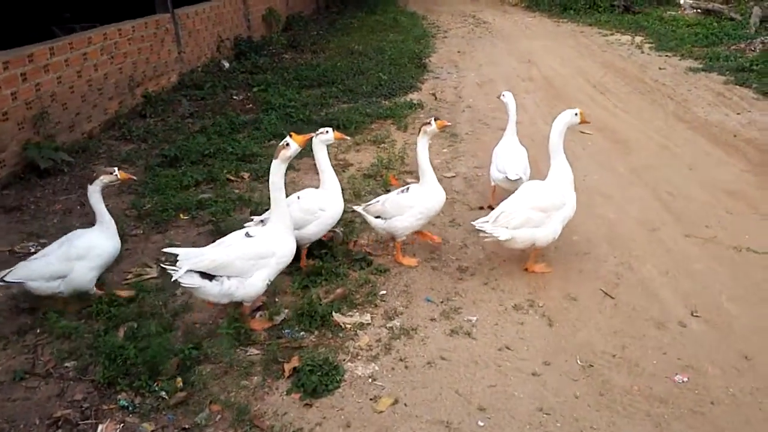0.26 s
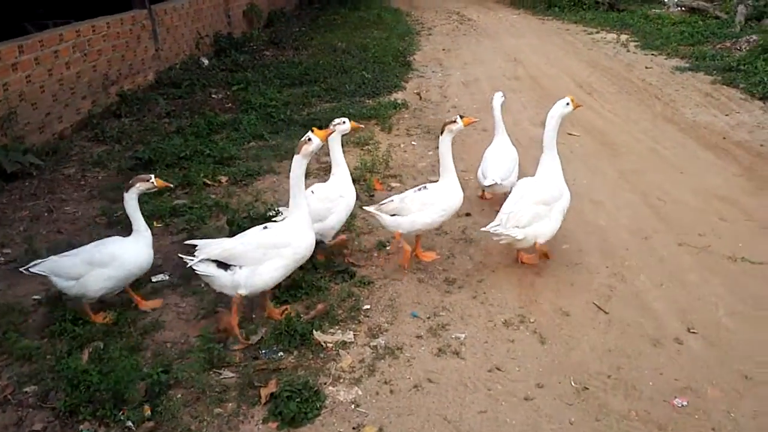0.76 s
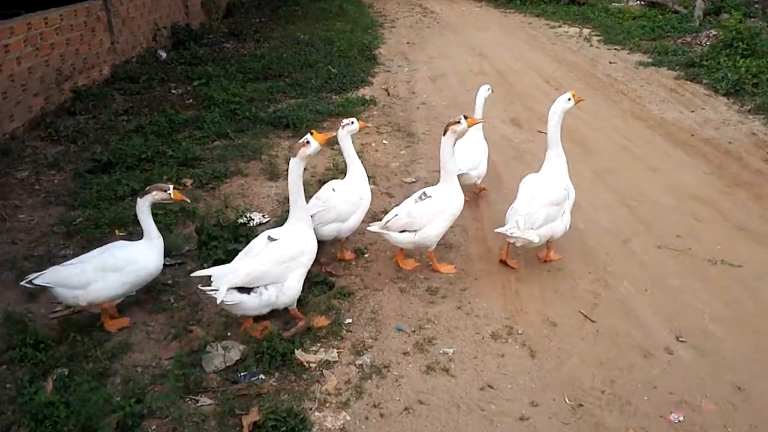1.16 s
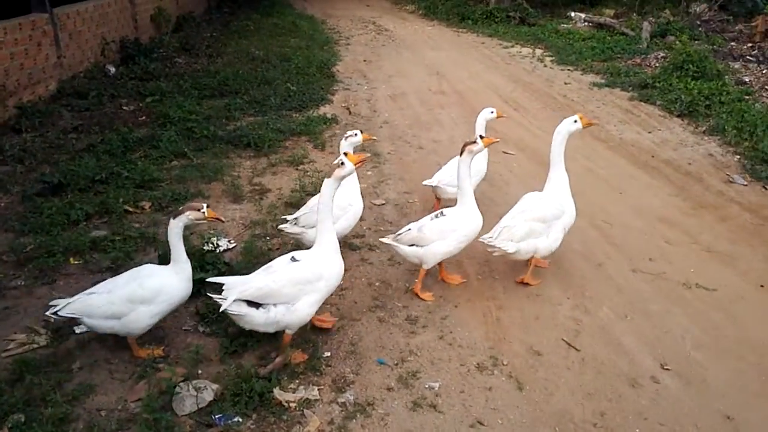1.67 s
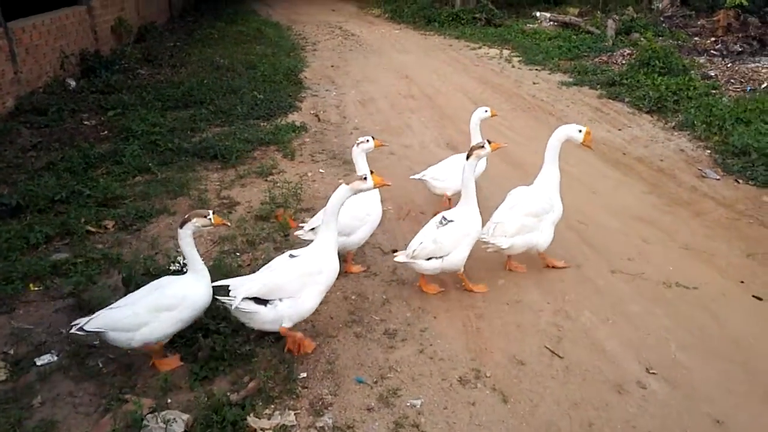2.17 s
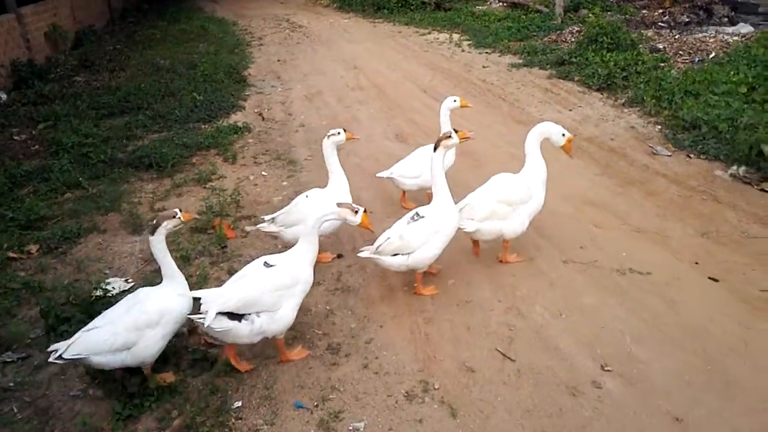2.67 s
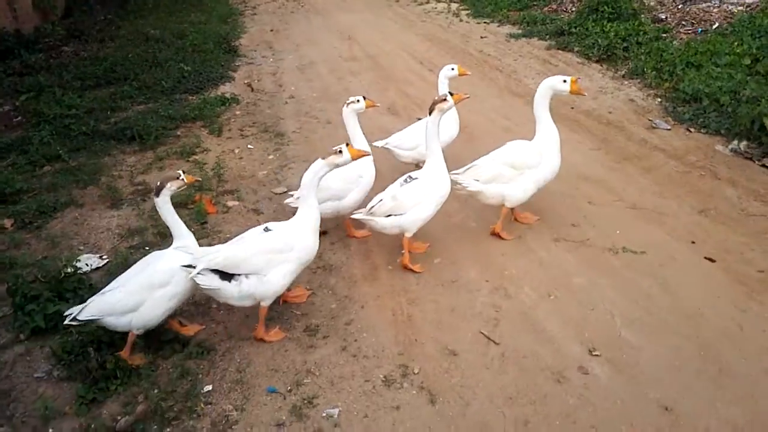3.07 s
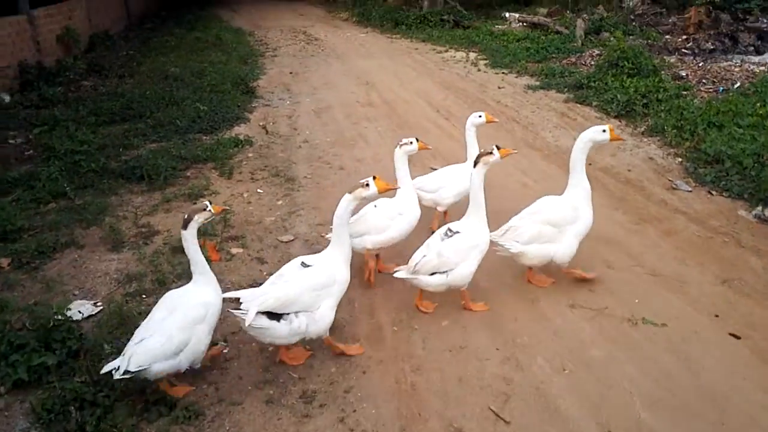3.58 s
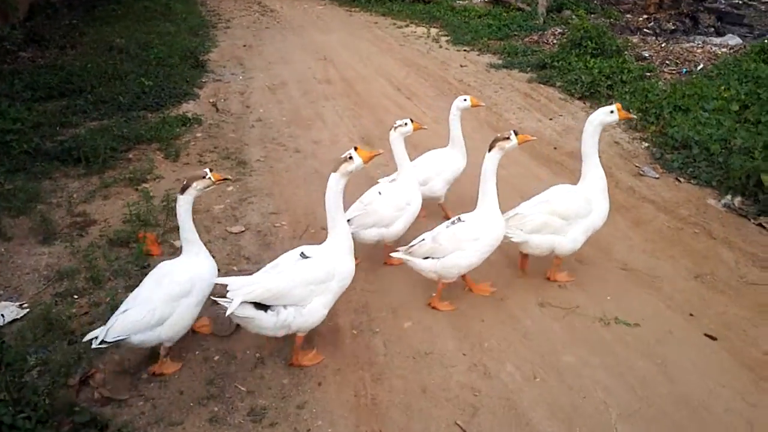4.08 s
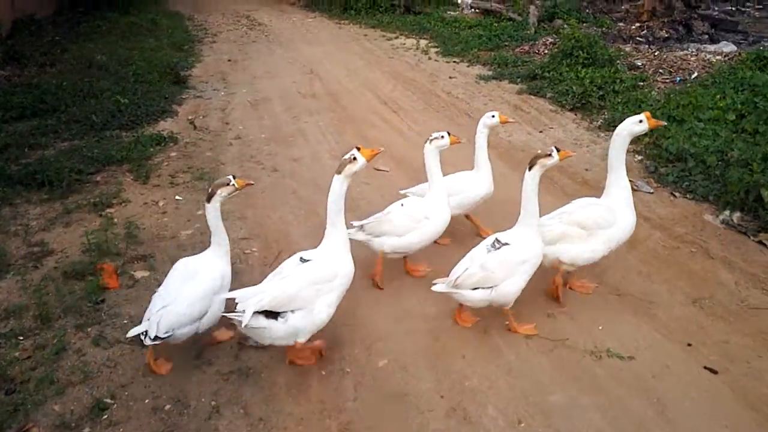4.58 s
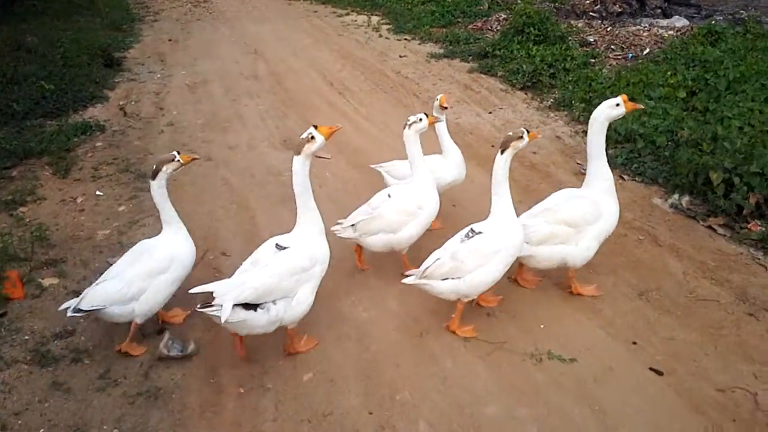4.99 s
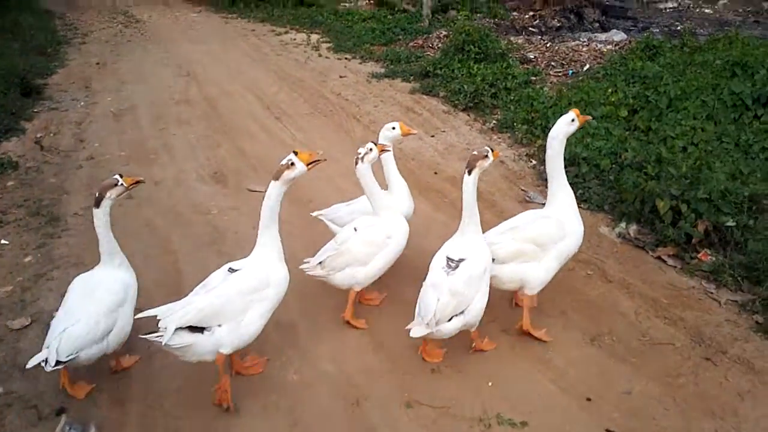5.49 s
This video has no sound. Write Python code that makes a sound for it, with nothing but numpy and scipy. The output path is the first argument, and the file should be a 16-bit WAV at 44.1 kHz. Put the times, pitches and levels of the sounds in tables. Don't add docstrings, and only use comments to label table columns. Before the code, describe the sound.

A small flock honks raspily close by outdoors, some calls breaking into clear tones, while feet crunch lightly on gritty ground.

```python
import sys
import numpy as np
from scipy import signal
from scipy.io import wavfile
from scipy.ndimage import uniform_filter1d

SR = 44100
rng = np.random.default_rng(int(sys.argv[2]) if len(sys.argv) > 2 else 0)


def transcribe(u):
    v = np.clip(np.atleast_2d(u).T, -1, 1)
    q = np.round(v * 32767).astype(np.int16)
    wavfile.write(sys.argv[1], SR, q)


def attenuation_scalar(level_db):
    decades = np.asarray(level_db, float) / 20
    return 10 ** decades


N = 253134

# f/Hz, width/Hz, level/dB
PIPE_1 = [(718, 46, 0), (1068, 12.6, 4), (1578, 100, 3.5), (1619, 31, 0.5), (2005, 12, 7.5),
          (3000, 110, -20), (3780, 170, -5.5), (5110, 130, -10), (6000, 550, -20.5), (8040, 2100, -24)]
PIPE_2 = [(626, 32.4, 2), (1055, 43, 0), (1262, 165, -0.5), (1426, 108, 1), (2020, 98, -8),
          (2736, 57, -8.5), (3426, 180, -7), (4000, 36, -10.5), (4330, 140, -14.5), (4810, 120, -11),
          (5490, 290, -19.5), (7340, 930, -23)]
PIPE_3 = [(700, 194, -15), (1430, 98, -4), (1710, 110, -9.5), (1900, 330, -17), (3330, 510, -16.5),
          (3630, 46, -13), (3940, 680, -20), (5510, 250, -21.5)]
PIPE_4 = [(512.4, 23, 6.5), (630, 170, -8.5), (915, 89, -5), (1265, 27, 7), (1690, 69, 4.5), (1720, 17, -4),
          (2360, 28, -8.5), (3070, 50, -9), (3500, 68, -6)]
PIPE_GRUNT = [(500, 29, -3.5), (630, 59, 3), (694, 81, -1), (984, 21, -11.5), (1450, 110, -19),
              (2150, 170, -21), (3340, 870, -18)]
PIPE_5 = [(567, 108, -3), (872, 23, -4), (1019.5, 26, 7), (1149, 71, 0.5), (1452, 47, 0), (1772, 33, 1),
          (2230, 250, -12.5), (2840, 95, -8), (3450, 131, -1.5), (3940, 130, -7), (4570, 217, -6),
          (5430, 470, -15), (6620, 1960, -12)]
PIPE_GROWL = [(490, 42, 0), (630, 22, 7.5), (967.5, 65, 2.5), (1400, 260, -5), (2810, 47, -2),
              (3350, 170, -1), (4500, 1300, -5.5), (6330, 690, -11.5)]
PIPE_6 = [(556, 28.7, 2.5), (680, 160, -10.5), (1060, 190, -0.5), (1152, 80, 0.5), (1400, 60, 2),
          (1771, 8.8, 0), (1872, 34, -2), (2795, 110, -12), (3360, 105, -4), (3800, 160, -11),
          (4470, 200, -10.5), (5680, 770, -21), (7000, 380, -17), (8600, 460, -39)]
# f/Hz, density/dB
HISS = [(900, -4), (1500, -0.5), (2400, 1), (3300, -1.5), (4500, 0), (6500, -2), (7800, -2), (9000, 3.5),
        (10200, -3.5), (11500, -8), (13500, -9.5), (14900, -15)]


def evened(x):
    return x / np.sqrt(np.mean(x ** 2) + 1e-20)


def add(mix, start_s, sound):
    part = mix[round(start_s * SR):][:len(sound)]
    part += sound[:len(part)]


def played(rows):
    s, *columns = np.transpose(rows)
    t = np.arange(s[0], s[-1], 1 / SR)
    return s[0], [np.interp(t, s, c) for c in columns]


def wander(n, size):
    return evened(uniform_filter1d(uniform_filter1d(rng.standard_normal(n), size), size))


def resonate(x, hz, width_hz):
    turn = np.exp(2j * np.pi * np.cumsum(hz * np.ones(len(x))) / SR)
    r = np.exp(-np.pi * max(width_hz, 5) / SR)
    return 2 * (turn * signal.lfilter([1 - r], [1, -r], x / turn)).real


def breath(start, length, db, hz, climb_hz, under_db, swell_s, first, last):
    climb_s, release_s, darken_s = .2, 0.063, 0.68
    fade_db_per_s, sag_per_s = 320, 1.367
    sag_lead_s = 0.05025
    t = np.arange(0, length + release_s, .005)
    after = np.maximum(t - length, 0)
    effort_db = db - under_db * np.exp(-t / swell_s) - fade_db_per_s * after
    sagging = np.maximum(t - length + sag_lead_s, 0) ** 1.5 / sag_lead_s ** .5 / 2
    rate_hz = (hz + climb_hz * (1 - np.exp(-t / climb_s))) * (1 - sag_per_s * sagging)
    bright = np.interp(t, [0, length], [first, last]) * np.exp(-after / darken_s)
    return np.transpose([start + t, effort_db, rate_hz, bright])


def honk(rows, pipe, rough, jitter, hum_db, bulge, slide, mid_db, burst_db, throb_db):
    throb_hz = 36.05
    start, (effort_db, hz, bright) = played(rows)
    n = len(hz)
    u = np.linspace(-.5, .5, n)
    stretch = (hz / np.median(hz)) ** .8
    moved = 1 + slide * u
    bright = bright + bulge * np.cos(np.pi * u)
    turns = np.cumsum(hz * (1 + jitter * wander(n, size=330))) / SR
    uneven = attenuation_scalar(1.5 * rough * rng.standard_normal(400)[turns.astype(int)])
    pulses = sum(np.cos(2 * np.pi * k * turns - .27 * k ** 2) / (1 + (k / 28) ** 2) for k in range(1, 58))
    puffs = (.5 + np.exp(-(turns % 1) / .4)) * rng.standard_normal(n)
    drive = uneven * (np.sqrt(1 - rough) * evened(pulses) + np.sqrt(rough) * evened(puffs))
    bursts = attenuation_scalar(.5 * burst_db * wander(n, size=260))
    throb = attenuation_scalar(throb_db * np.sin(2 * np.pi * throb_hz * u * n / SR + .4 * np.log(bursts)))
    low, high = np.zeros(n), np.zeros(n)
    for k, (f, width_hz, db) in enumerate(pipe):
        curve_hz = f * (stretch if f < 2500 else moved)
        ring = (-1) ** k * attenuation_scalar(db) * resonate(drive, curve_hz, 1.74 * width_hz)
        if 1500 < f < 2500:
            ring = ring * attenuation_scalar(mid_db * u)
        if f < 2500:
            low += resonate(ring, curve_hz, 900)
        else:
            high += resonate(ring, curve_hz, .18 * f) * (abs(bright) * bursts) ** (f / 3000)
    beak = signal.butter(6, 450, "high", fs=SR, output="sos")
    body = signal.sosfilt(beak, low + high) / np.std(low)
    hum = attenuation_scalar(hum_db) * uneven * np.sin(2 * np.pi * turns)
    return start, attenuation_scalar(effort_db) * (throb * body + hum) * signal.windows.tukey(n, .04)


def honking():
    # t/s, length/s, effort/dB, pulse rate/Hz, climb/Hz
    calls = [
        (1.337, 0.12, -34, 162, 9.1),
        (1.48, 0.27, -33, 168.8, 12.9),
        (1.779, 0.36, -38.5, 234.5, 20.3),
        (2.499, 0.48, -46, 149.9, 21.1),
        (3.596, 0.18, -38, 144.3, 15.8),
        (3.744, 0.43, -33.5, 151.6, 25.8),
        (4.709, 0.255, -40.5, 118.3, 16),
        (5.149, 0.024, -37, 147.8, 1.1),
        (5.206, 0.42, -33, 149.6, 23),
        (5.622, .12, -36, 170.8, 3.1),
    ]
    # level under full effort/dB, swell/s, brightness at start, at end, beak hiss/dB
    openings = [(14.8, 0.022, 0.97, 1.13, -41), (6.5, 0.069, 1.05, 1.02, -22.5),
                (3.5, 0.16, 0.58, 0.89, -18), (22, 0.021, 0.6, 1.57, -37), (28, 0.037, 0.4, 0.59, -38),
                (10.3, 0.06, 1.06, 0.86, -45), (15.4, 0.12, 0.17, 1.42, -24), (14, 0.016, 2, 1.3, -2),
                (15.7, 0.031, 0.99, 0.79, -28), (9, 0.028, .45, 0.52, -37)]
    # windpipe, roughness 0-1, rate jitter share, hum/dB
    voices = [(PIPE_1, .62, .011, -28), (PIPE_2, .62, .011, -31), (PIPE_3, .78, .02, -60),
              (PIPE_4, .67, .012, -26), (PIPE_GRUNT, .68, .02, -24), (PIPE_5, .6, .011, -27),
              (PIPE_GROWL, .82, .1, -30), (PIPE_6, .7, .02, -29), (PIPE_6, .58, .01, -29),
              (PIPE_6, .75, .02, -29)]
    # extra brightness midway, treble slide share, change at 1.5-2.5 kHz/dB, treble bursts/dB
    beaks = [(0.071, 0.044, 2.5, 1), (0.21, -0.056, -3, 1), (0, -0.057, 1, 1), (0, 0.012, 2.5, 4),
             (0.21, 0, 15, 7), (0, -0.089, -12.5, 2), (0, 0.041, 0, 2.5), (0, 0.0018, 13, 4),
             (0.077, -0.11, -13.5, 2.5), (0, 0, -3, 6)]
    throbs_db = [2.5, 1, .6, 1.5, 1, 1.8, .6, 0, .8, .8]
    mix = np.zeros(N)
    hiss = np.tile(breeze(HISS, 0, patchy_db=-2.0, flicker_db=4.5), 2)
    for call, (*opening, hiss_db), voice, beak, throb_db in zip(calls, openings, voices, beaks, throbs_db):
        rows = breath(*call, *opening)
        add(mix, *honk(rows, *voice, *beak, throb_db))
        start, (effort_db, _, _) = played(rows)
        add(mix, start, attenuation_scalar(effort_db + hiss_db) * hiss[round(start * SR):][:len(effort_db)])
    return mix


def note(start, length, db, hz, glide_hz_per_s):
    edge_db, edge_droop, early = 19, 0.054, 0.83
    u = np.linspace(0, 1, 21)
    off = (2 * u ** early - 1) ** 2
    pitch_hz = hz * (1 - edge_droop * off) + glide_hz_per_s * length * (u - .5)
    return np.transpose([start + u * length, pitch_hz, db - edge_db * off ** 1.2])


def tone(rows, tones, waver=0.0068, flutter_db=-5.5, lock=(0, 0, 0)):
    start, (hz, level_db) = played(rows)
    t = start + np.arange(len(hz)) / SR
    lock_start_s, lock_end_s, dulling_db_per_s = lock
    slope_db = -dulling_db_per_s * abs(t - np.clip(t, lock_start_s, lock_end_s))
    turns = np.cumsum(hz * (1 + waver * wander(len(hz), size=300))) / SR
    stack = np.zeros(len(hz))
    for k, db in tones:
        flutter = flutter_db * min(k / 4, 1) ** .5 * wander(len(hz), size=1100)
        gain = attenuation_scalar(db - tones[0][1] + k * slope_db + flutter)
        stack += gain * np.sin(2 * np.pi * k * turns + 0.132 * k ** 2)
    return start, np.sqrt(2) * attenuation_scalar(level_db) * stack * signal.windows.tukey(len(hz), .1)


def clear_calls():
    # t/s, f/Hz, level/dB
    drone = [(1.77, 960, -34), (1.8, 965, -39), (2.1, 1039, -36.5), (2.148, 1018, -44), (2.165, 1040, -62)]
    last_drone = [(5.419, 993.5, -39), (5.551, 1009, -35.5), (5.74, 1028, -32)]
    whine = [(1.78, 678, -49), (1.95, 708, -39), (2.2, 745, -47.5), (2.524, 761, -48), (2.62, 811, -55)]
    moan = [(3.605, 616, -53), (3.64, 626, -50), (3.75, 630, -43), (3.9, 641, -39.5), (4.03, 610, -43),
            (4.08, 610, -74)]
    bugle = [(4.92, 472, -58), (4.955, 478, -45.5), (4.99, 484.6, -41), (5.06, 488, -41.5),
             (5.12, 489.2, -40.5), (5.15, 492, -44), (5.18, 475, -45.5), (5.21, 461, -38)]
    chirp = [(5.146, 1303, -52), (5.156, 1324, -35), (5.172, 1370, -30), (5.183, 1372, -28),
             (5.196, 1334, -34), (5.212, 1270, -43)]
    # t/s, f/Hz, level/dB
    ringing = [
        [(1.545, 1440, -50), (1.57, 1441, -42), (1.66, 1450, -40), (1.685, 1460, -52)],
        [(1.685, 1372, -46), (1.705, 1387, -35), (1.722, 1400, -33.5), (1.74, 1450, -35), (1.765, 1450, -35),
         (1.78, 1420, -50)],
        [(2.52, 1502, -50), (2.55, 1521, -47), (2.64, 1585, -56), (2.74, 1632, -52), (2.79, 1672, -53)],
        [(5.29, 1363, -42), (5.32, 1380, -33.5), (5.36, 1400, -31), (5.385, 1430, -33), (5.4, 1420, -46)],
        [(5.385, 1490, -50), (5.41, 1515, -37), (5.44, 1535, -48)],
        [(5.6, 1394, -40), (5.632, 1396, -34), (5.648, 1400, -46)],
        [(5.67, 1410, -43), (5.69, 1423, -36), (5.72, 1400, -43), (5.74, 1400, -37)],
    ]
    # multiple of pitch, level/dB
    drone_tones = [(1, 10.5), (2, -2), (3.009, -18), (4.01, -13.5)]
    whine_tones = [(1, 7), (2, 5.5), (3, -9), (4, -10.5), (5, -9.5), (6, -8), (7, -26), (8, -40), (9, -43),
                   (10, -19)]
    hoarse_whine_tones = [(1, 9), (2, 10), (3, 2), (4, -18), (5, -16)]
    bugle_tones = [(1, -2.5), (2, -1.5), (3, -7), (4, -15.5), (5, -20), (6, -17), (7, -8.5), (8, -16.5),
                   (9, -12), (10, -12.5), (11, -15), (12, -12), (13, -14), (14, -15.5), (15, -25),
                   (16, -18), (17, -4.5), (18, -7), (19, -13), (20, -18), (21, -15), (22, -15), (23, -25),
                   (24, -40), (25, -36), (26, -21)]
    closing_tones = [(1, 0), (1.5, 0), (2, -6), (2.749, -24.5)]
    pure = [(0.98, 0)]
    # t/s, length/s, peak/dB, f/Hz, glide/(Hz/s)
    peeps = [(0.458, 0.035, -56, 790, 0), (0.505, 0.03, -60, 780, 0), (0.652, 0.025, -57, 1400, -3000),
             (0.6, 0.078, -46, 772, -700), (0.677, 0.28, -63.5, 780, -30), (4.948, 0.038, -44, 1330, 300),
             (5.139, 0.158, -42.5, 617, -500), (5.547, 0.1, -44, 1380, -100), (5.67, 0.1, -39, 1510, 0),
             (2.664, 0.028, -40, 1610, 2), (2.754, 0.04, -50, 1660, 2), (2.668, 0.03, -52, 3520, 0),
             (2.755, .03, -54, 3480, 0), (1.85, .17, -57, 3600, 700), (2.031, .12, -55, 3860, 500)]
    yelps = [
        (2.14, 0.09, -50, 685, -2000),
        (2.465, 0.079, -50.5, 713, -10),
        (2.89, 0.16, -50, 648, -350),
    ]
    mix = np.zeros(N)
    for rows in (drone, last_drone):
        add(mix, *tone(rows, drone_tones, waver=0.0143, flutter_db=3.0))
    for rows in (whine, note(*yelps[1])):
        add(mix, *tone(rows, whine_tones, flutter_db=3.5, lock=(2.4, 2.5, 11)))
    add(mix, *tone(note(*yelps[-1]), closing_tones, waver=0.011))
    add(mix, *tone(note(*yelps[0]), hoarse_whine_tones, waver=0.0076))
    add(mix, *tone(bugle, bugle_tones, waver=.001, flutter_db=2.0, lock=(5.0, 5.13, 22)))
    add(mix, *tone(moan, pure, waver=.035, flutter_db=4))
    for peep in peeps:
        add(mix, *tone(note(*peep), pure, waver=.007, flutter_db=2.4))
    add(mix, *tone(chirp, [(1, 0), (2, -26)], waver=.002, flutter_db=.5))
    for rows in ringing:
        add(mix, *tone(rows, [(1, 0)], waver=.006, flutter_db=3))
    return mix


def geese():
    calls = honking() + clear_calls()
    t = np.arange(SR // 2) / SR
    echoes = rng.choice([-1., 1.], len(t)) * (rng.random(len(t)) < .03) * (t > .008)
    echoes *= attenuation_scalar(-60 * t / .2) + attenuation_scalar(-13 - 60 * t / .7)
    return calls + attenuation_scalar(-17) * signal.oaconvolve(calls, echoes / np.linalg.norm(echoes))[:N]


def scuffs():
    # t/s, level/dB, length/s, centre f/Hz, width/Hz
    drags = [(0.422, -54.5, 0.09, 7000, 5200), (0.51, -47, 0.065, 8500, 7000),
             (0.961, -58, 0.12, 8900, 2500), (1.03, -53, 0.048, 9050, 4800),
             (2.345, -55.5, 0.11, 5900, 10000), (2.479, -55, 0.076, 4100, 3300),
             (3.4, -56.5, 0.084, 9200, 5000), (3.4, -63, .075, 3000, 700), (3.34, -66, 0.027, 1700, 600),
             (1.245, -66, 0.037, 1150, 420), (3.491, -57, 0.1, 9550, 2500), (3.522, -58, 0.098, 2980, 810),
             (4.383, -73, 0.065, 2980, 890), (4.406, -60.5, 0.049, 1320, 900),
             (4.13, -51.5, 0.1, 7200, 6000), (4.6, -60, 0.01, 2960, 4170),
             (4.443, -48.5, 0.0075, 2000, 3000), (4.499, -52, 0.023, 3300, 6900),
             (4.547, -56, 0.028, 3500, 8400), (4.4745, -43.5, 0.033, 3020, 8900),
             (4.527, -40.5, 0.018, 8700, 4000), (4.527, -45.5, 0.021, 610, 1180),
             (4.578, -46, 0.042, 9400, 3500), (4.579, -51, 0.033, 4700, 1500),
             (4.576, -56.5, 0.079, 1100, 1100), (4.62, -60.5, 0.11, 8700, 2200),
             (4.608, -56, 0.037, 6000, 6100)]
    mix = np.zeros(N)
    for s, db, length, hz, width_hz in drags:
        t = np.arange(0, 2 * length, 1 / SR)
        grit = rng.standard_normal(SR // 3)[:len(t)] * attenuation_scalar(2.3 * wander(SR // 3, size=40)[:len(t)])
        shape = np.minimum(t / length ** 2, 1) / (1 + (t / length) ** 6)
        grit = resonate(resonate(grit, hz, width_hz), hz, 2.0 * width_hz)
        add(mix, s, attenuation_scalar(db) * shape * evened(grit))
    return mix


def snaps():
    # t/s, peak/dB, ring f/Hz, ring share
    cracks = [(0.434, -33, 6000, 0.71), (0.514, -28, 1400, 0.35), (2.833, -32, 7000, 0.091),
              (3.232, -43.5, 8735, 1.4), (3.509, -35, 9400, 1.5), (4.405, -43.5, 1110, 5),
              (4.4245, -43, 2000, 2), (4.444, -44, 2400, 1.2), (4.4764, -30, 1090, 2.5),
              (4.5014, -17.5, 1210, 0.45), (4.525, -39, 8000, .5), (4.7037, -27, 1400, 1.4),
              (1.141, -41.5, 3270, 2.5), (1.255, -41, 3000, 2.5), (4.484, -36, 1400, 6),
              (4.521, -41, 1250, 6), (4.589, -39, 1400, 4), (4.502, -36, 1300, 2.3),
              (4.541, -32.5, 1400, 4), (4.611, -34, 4500, .8), (4.7038, -35, 9240, 5.1)]
    mix, t = np.zeros(N), np.arange(600) / SR
    for s, db, hz, ring in cracks:
        crack = rng.standard_normal(len(t)) * (np.exp(-t / .00015) + .1 * np.exp(-t / .003)) + 3 * (t == 0)
        crack = resonate(resonate(crack, 5000, 7000), 5000, 9000)
        snap = evened(crack) + ring * evened(resonate(crack, hz, 170))
        add(mix, s, attenuation_scalar(db) * snap / abs(snap).max())
    return mix


def feet():
    return signal.sosfilt(signal.butter(3, 420, "high", fs=SR, output="sos"), scuffs() + snaps())


def breeze(spectrum, level_db, patchy_db, flicker_db):
    frames, hz = N // 256 + 5, np.fft.rfftfreq(1024, 1 / SR)
    a, b, patches = rng.standard_normal((frames, 513, 3)).T
    patches = evened(uniform_filter1d(uniform_filter1d(patches, 10, 0), 10, 1))
    f, db = np.transpose(spectrum)
    colour_db = np.interp(np.log(hz + 1), np.log(f + 1), db, left=-90, right=-90)
    z = (a + 1j * b) * attenuation_scalar(colour_db[:, None] + patchy_db * patches + flicker_db * wander(frames, size=3))
    return attenuation_scalar(level_db) * evened(signal.istft(z, nperseg=1024, noverlap=768)[1][:N])


def level_curve(rows):
    return np.interp(np.arange(N) / SR, *np.transpose(rows))


def rustle():
    # t/s, level/dB
    stirs = [(0, -56.5), (.9, -58), (1.29, -58.5), (1.325, -63), (2.2, -61), (2.6, -65.5), (3.0, -62),
             (3.22, -70), (3.4, -64.5), (3.7, -62), (4.3, -68), (4.65, -60), (4.8, -70.5), (4.98, -48.5),
             (5.02, -62), (5.12, -66), (5.16, -55.5), (5.74, -46.5)]
    return breeze(HISS, level_curve(stirs) + 10, patchy_db=.8, flicker_db=.6)


def murmur():
    # f/Hz, density/dB
    colour = [(120, -14), (200, -3.5), (515, 0), (678, 1.5), (1010, -3), (1120, -2.5), (1530, -13),
              (3500, -8.5), (4550, -62), (7700, -120)]
    # t/s, level/dB
    swells = [(0, -49), (.55, -50.5), (.75, -53), (1.3, -58.5), (2.3, -58.5), (3.0, -51.5), (3.2, -60),
              (3.6, -55), (4.3, -54), (4.6, -55), (4.95, -53.5), (5.01, -58), (5.13, -58), (5.2, -47.5),
              (5.74, -51)]
    return breeze(colour, level_curve(swells), patchy_db=2.5, flicker_db=.7)


def wind():
    # f/Hz, density/dB
    colour = [(12, -34), (20, -8.5), (59, 4), (81, -0.5), (124, 1), (155, -19.5), (193, 7.5), (300, -51.5),
              (390, -56), (660, -120)]
    # t/s, level/dB
    gusts = [(0, -53.5), (1.3, -58), (1.8, -53.5), (2.4, -59), (3.0, -54.5), (4.1, -51.5), (4.3, -58),
             (4.701, -54), (5.13, -52), (5.74, -51.5)]
    return breeze(colour, level_curve(gusts), patchy_db=1.5, flicker_db=0.7)


def bumps():
    # t/s, peak/dB, f/Hz
    pushes = [
        (0.439, -42, 52),
        (1.689, -47, 39.3),
        (1.866, -38.5, 83.6),
        (5.022, -41.5, 102),
    ]
    mix, t = np.zeros(N), np.arange(0, .05, 1 / SR)
    for s, db, hz in pushes:
        add(mix, s, attenuation_scalar(db) * np.hanning(len(t)) * np.sin(2 * np.pi * hz * t))
    return mix


def scene():
    air = rustle() + murmur() + wind() + bumps()
    return np.tile(attenuation_scalar(9.5) * (geese() + feet()) + air, (2, 1))


def masked(x):
    mask_db, mask_hz = -48, 8500
    hz, _, z = signal.stft(x, SR, nperseg=1024, noverlap=768)
    power = uniform_filter1d(uniform_filter1d(abs(z[0]) ** 2, size=4, axis=0), size=5, axis=1)
    streaks = rng.standard_normal(power.T.shape)
    streaks = evened(uniform_filter1d(uniform_filter1d(streaks, size=9, axis=0), size=5, axis=1)).T
    limit = uniform_filter1d(power.max(0), size=12) * attenuation_scalar(2 * mask_db)
    faint = (power * attenuation_scalar(10 * streaks) < limit) & (hz[:, None] > mask_hz)
    return signal.istft(z * np.where(faint, .03, 1), SR, nperseg=1024, noverlap=768)[1][:, :N]


def band_limit(x):
    return signal.sosfilt(signal.butter(12, 15060, fs=SR, output="sos"), x)


def record(dry):
    delay, muffle_hz, droop_hz, edge_hz = 24, 310, 11900, 14400
    keep = np.exp(-2 * np.pi * muffle_hz / SR)
    late = np.append(np.zeros(delay), dry[1, :-delay])
    ports = np.array([dry[0], signal.lfilter([1 - keep], [1, -keep], late)])
    ports = signal.sosfilt(signal.butter(3, droop_hz, fs=SR, output="sos"), ports)
    edge = signal.firwin(401, edge_hz, window=("kaiser", 8), fs=SR)
    ports = signal.oaconvolve(ports, edge[None], "same", axes=1)
    return band_limit(masked(ports))


dry = scene()
out = record(dry)
transcribe(out)
```